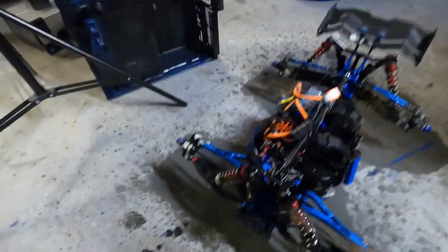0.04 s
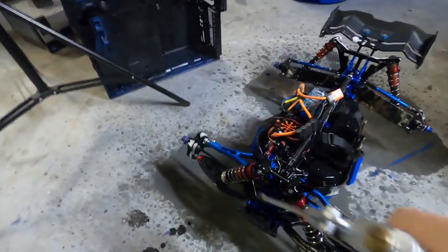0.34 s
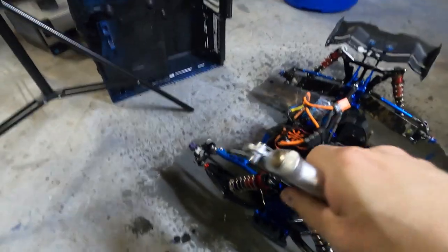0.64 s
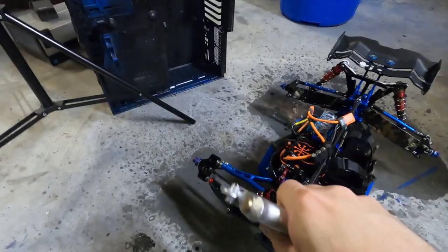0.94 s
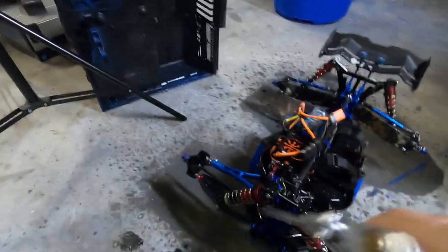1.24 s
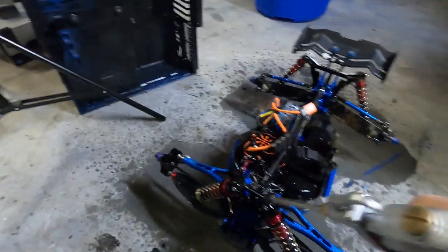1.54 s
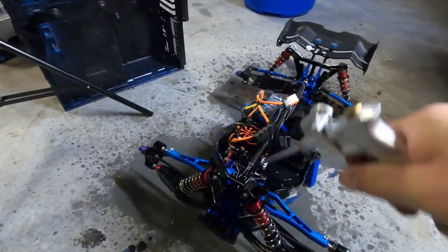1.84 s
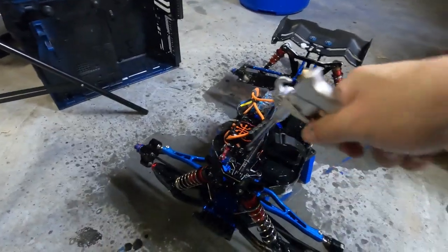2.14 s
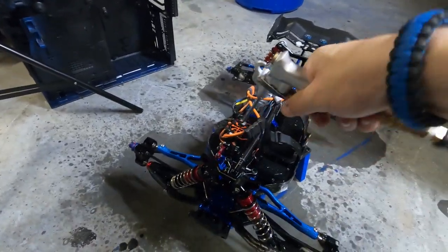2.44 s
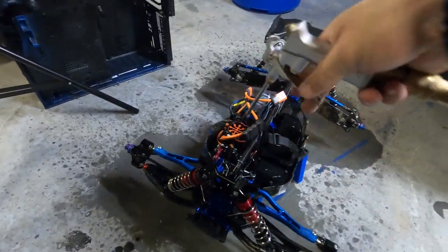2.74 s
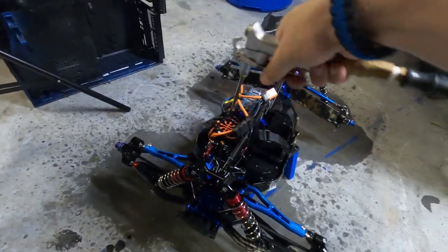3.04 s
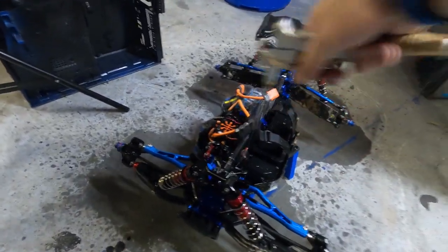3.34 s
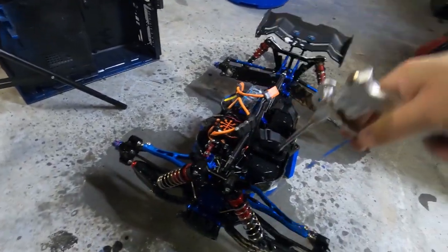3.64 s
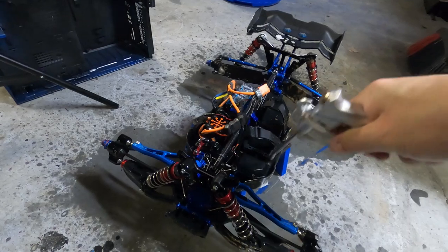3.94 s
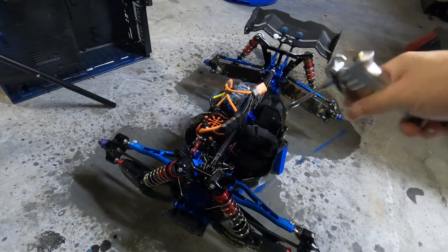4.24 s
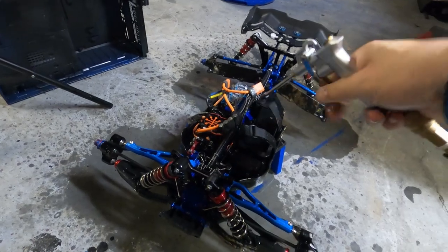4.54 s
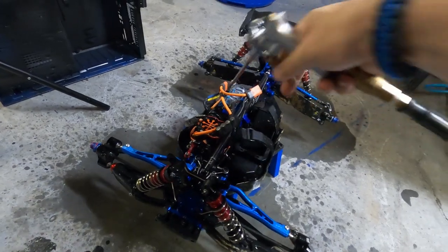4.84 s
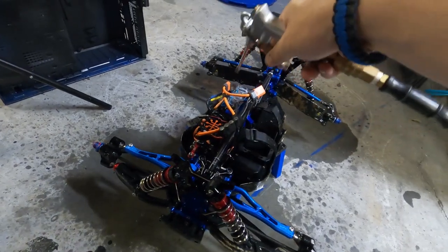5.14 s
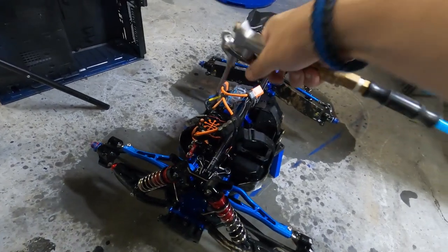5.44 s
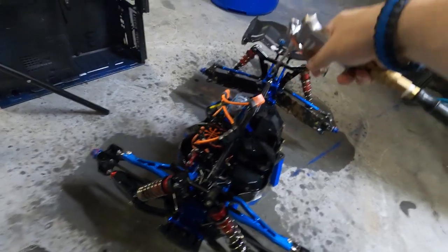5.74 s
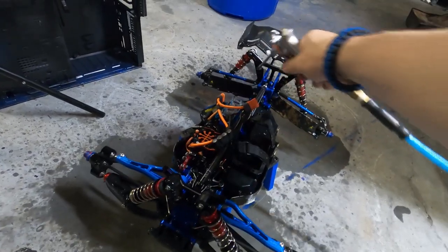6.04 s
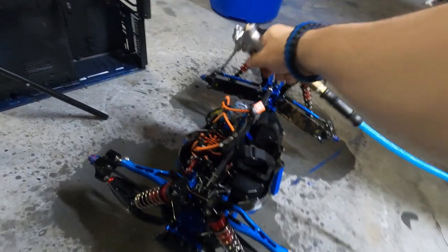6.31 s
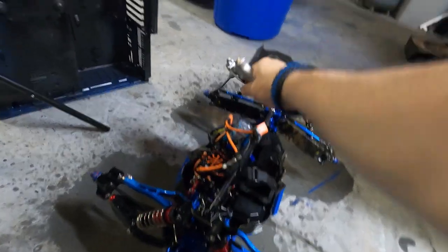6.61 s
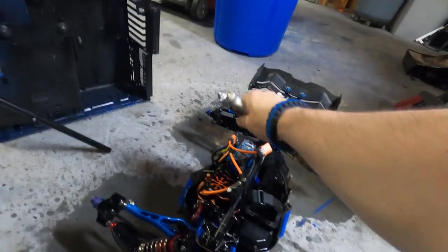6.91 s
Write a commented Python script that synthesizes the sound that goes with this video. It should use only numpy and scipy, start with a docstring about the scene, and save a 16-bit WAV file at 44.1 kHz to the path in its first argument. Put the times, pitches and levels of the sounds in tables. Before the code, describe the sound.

Close bursts of compressed air hiss and roar over a small wet model car, with faint trigger ticks and short pauses.

```python
"""Ten hissing blasts of an air blow gun, drying a small wet model car on a concrete garage floor.
The jet hisses at the nozzle, roars on the chassis, sounds its hollows and tears water into spray.
Close by, the trigger ticks and the valve shuts with a thump; stray air buffets the stereo microphone.
A short, diffuse tail follows each blast, over the garage's low, quiet room tone."""
import sys
import numpy as np
from scipy import signal
from scipy.fft import rfft, irfft, next_fast_len
from scipy.io import wavfile

SR = 44100
rng = np.random.default_rng(int(sys.argv[2]) if len(sys.argv) > 2 else 0)


def dump(signal):
    """Clip the signal to [-1, 1] and save it as 16-bit WAV at the path in sys.argv[1]."""
    limited = np.clip(np.atleast_2d(signal).T, -1, 1)
    pcm = np.round(limited * 32767).astype(np.int16)
    wavfile.write(sys.argv[1], SR, pcm)


N = 311787
TIME = np.arange(N) / SR
FREQS = np.maximum(np.arange(N // 2 + 1) * SR / N, 1)

# One row per trigger pull, with the relative level of each layer and of the tail that follows:
# open_s, shut_s, hiss_db, roar_db, hollow_db, sizzle_db, spray_db, wind_db, tail_db, thump_db
BLASTS = [(0.093, 1.302, -26, -26.5, -28.5, -35.5, -34.5, -59, 7.5, -55),
          (1.635, 2.61, -22.5, -29, -39.5, -30, -59, -49, 10.5, -31),
          (2.889, 3.562, -22.5, -30.5, -43.5, -30.5, -62, -43.5, 10.5, -28),
          (3.821, 4.157, -22.5, -31, -41.5, -30.5, -51, -43, 13, -24),
          (4.441, 4.665, -22, -28.5, -43.5, -33.5, -61, -41.5, 13.5, -25),
          (4.96, 5.172, -21.5, -32, -44.5, -29, -35, -36, 12.5, -19),
          (5.420, 5.621, -23, -31.5, -40.5, -34, -52, -40, 13, -24.5),
          (6.082, 6.485, -23.5, -24, -35.5, -34.5, -43, -43.5, 10, -25),
          (6.669, 6.901, -23.5, -27, -37, -32, -33, -45.5, 11.5, -22),
          (7.035, 7.2, -24.5, -27, -35.5, -31, -32.5, -44, 0, -40)]
OPENS, SHUTS, HISS_DB, ROAR_DB, HOLLOW_DB, SIZZLE_DB, SPRAY_DB, WIND_DB, TAIL_DB, THUMP_DB = (
    np.transpose(BLASTS))
# The blast each sample belongs to, including four fifths of the pause after it.
BLAST_AT = np.searchsorted((SHUTS[:-1] + 4 * OPENS[1:]) / 5, TIME)


def valve(crack_s, leak_db, rise_s, shut_s, surge_db, surge_s):
    """Airflow: the valve first leaks, then opens on the hose's stored pressure, and snaps shut."""
    flow = np.zeros(N)
    for start, end in zip(OPENS, SHUTS):
        leak = from_db(leak_db) * np.clip((TIME - start + crack_s) / crack_s, 0, 1) ** 2
        opening = np.clip((TIME - start + rise_s) / rise_s, 0, 1) ** 2
        surge = 1 + (from_db(surge_db) - 1) * np.clip(1 - (TIME - start) / surge_s, 0, 1)
        closing = np.clip(1 - (TIME - end) / shut_s, 0, 1) ** 2
        flow += np.maximum(leak, opening) * surge * closing
    return flow


# Resonances of the five parts of the jet's noise, heard close: pitch_hz, width_hz, level_db
HISS = [(3430, 1100, 0.5), (4010, 1230, 4), (5430, 970, -3.5), (6640, 2460, -6.5)]
ROAR = [(1176, 127, 1), (1468, 1100, 0.5), (1980, 640, -3)]
HOLLOW = [(586, 625, -2.5), (840, 385, 4)]
SIZZLE = [(9260, 1500, 0)]
SPRAY = [(10500, 8100, 12), (13000, 2600, -13)]
# The first three blasts sweep across the car and into its hollows: time_s, force_db, depth_db
SWEEPS = [
    [(.09, 6, -8), (.26, 0, -6), (.39, 1, -12), (.43, -4, 1.5), (.65, 0.5, -1.5), (.87, -4, 0.5),
     (1.0, 2, -4.5), (1.22, -1, 1), (1.3, -8, 5)],
    [(1.64, -2, 2.5), (1.8, 2, 2), (2.1, -1, -3.5), (2.23, 0, 4), (2.36, -0.5, -5), (2.47, .5, 3),
     (2.56, 0.5, -7.5)],
    [(2.89, -1, -2.5), (3.02, -2.5, 3.5), (3.12, -3, -10), (3.27, 1, 1.5), (3.35, 0, -6.5),
     (3.53, -0.5, 6.5)],
]
# The jet drops into a cavity and roars: middle_s, half_span_s, extra_depth_db
CAVITIES = [(.58, 0.13, 4.5), (4.12, 0.18, 2), (4.45, .05, 8.5), (4.63, 0.054, 4.5), (4.974, 0.036, 11.5),
            (5.51, 0.17, 9.5), (6.315, 0.034, 2)]
# It slips through a gap and briefly loses its target: middle_s, half_span_s, dip_db
SLIPS = [(.30, 0.021, 6), (1.73, 0.063, 6.5), (1.85, 0.1, 8), (3.225, 0.038, 2), (3.40, 0.032, 7),
         (4.0, 0.053, 12), (6.35, 0.028, 8), (6.48, 0.14, 4.5)]
# It finds a pocket of water and flings it out: middle_s, half_span_s, spray_db
SPLASHES = [(.355, 0.043, -28), (.475, 0.033, -31), (1.27, 0.15, -35.5), (1.72, 0.23, -30.5),
            (1.85, 0.13, -32.5), (2.01, 0.21, -32), (2.55, 0.1, -36), (2.92, .14, -30.5)]


def jet(puff_s, drying_db_per_s):
    """Air leaves the nozzle and breaks on the wet chassis; the spray thins as the spot dries."""
    age = np.maximum(TIME - OPENS[BLAST_AT], 0)
    force_db, depth_db = sum(in_time(sweep) * (BLAST_AT == k) for k, sweep in enumerate(SWEEPS))
    depth_db += swells(CAVITIES)
    impact_db = force_db - swells(SLIPS)
    puff_db = 2 * np.exp(-age / puff_s)   # the first slug of air hits harder
    # aiming deeper takes away hiss and adds roar
    hiss_db = HISS_DB[BLAST_AT] + impact_db - 0.12 * depth_db
    roar_db = ROAR_DB[BLAST_AT] + impact_db + 0.66 * depth_db + puff_db
    hollow_db = HOLLOW_DB[BLAST_AT] + force_db + depth_db + puff_db
    air = turbulence(HISS, hiss_db, flutter_db=2.0, flutter_hz=10)
    air += turbulence(ROAR, roar_db, flutter_db=1.77, flutter_hz=23)
    air += turbulence(HOLLOW, hollow_db, flutter_db=2.24, flutter_hz=37)
    air += turbulence(SIZZLE, SIZZLE_DB[BLAST_AT] + force_db, flutter_db=1.5, flutter_hz=29)
    water = from_db(SPRAY_DB[BLAST_AT] - drying_db_per_s * age) + swells_db(SPLASHES)
    return air + water * stereo_noise(resonances(SPRAY), pan_db=-4.0)


def turbulence(modes, level_db, flutter_db, flutter_hz):
    """Eddies excite resonances and make their level flutter."""
    return from_db(level_db + flutter_db * drift(flutter_hz)) * stereo_noise(resonances(modes))


# Passing bands of noise in the jet: start_s, end_s, pitch_hz, width_hz, level_db
BREATHY_BANDS = [(0.087, 0.337, 1840, 850, -25.5), (0.226, 0.273, 3760, 500, -21),
                 (0.415, 0.454, 930, 240, -24.5), (.33, 1.25, 4300, 584, -41), (1.636, 1.7, 2210, 190, -30),
                 (1.637, 1.70, 3750, 700, -23), (1.627, 2.2, 5360, 750, -30),
                 (2.185, 2.597, 3740, 500, -29.5), (2.3, 2.634, 2010, 400, -34),
                 (2.957, 3.217, 3970, 590, -24), (3.301, 3.367, 3730, 650, -22.5),
                 (3.53, 3.573, 840, 150, -35), (3.828, 3.957, 3580, 900, -27),
                 (4.114, 4.173, 3150, 500, -26.5), (4.438, 4.64, 1680, 704, -31),
                 (5.04, 5.166, 9070, 550, -27.5), (5.43, 5.44, 4220, 700, -17.5),
                 (5.462, 5.597, 2420, 166, -34), (5.453, 5.557, 3080, 400, -27.5),
                 (6.081, 6.467, 2980, 600, -30), (6.085, 6.2, 3750, 900, -28.5),
                 (6.208, 6.233, 8900, 600, -24.5), (6.656, 6.744, 2870, 300, -30.5)]


def breathy_bands(fade_s):
    """Bands of breathy noise, from narrow whistles to broad rushes, swell and colour the jet."""
    out, white = np.zeros(N), rng.standard_normal(N)
    for start, end, hz, width, db in BREATHY_BANDS:
        on = slice(*np.searchsorted(TIME, [start - fade_s, end + fade_s]))
        swell = np.clip(np.minimum(TIME[on] - start, end - TIME[on]) / fade_s + .5, 0, 1)
        b, a = signal.iirpeak(hz, hz / width, fs=SR)
        band = signal.lfilter(b, a, signal.lfilter(b, a, white[on]))
        out[on] += from_db(db) * swell * rms_one(band)
    return out


def thumps(hz, t60_s, gain_db, lag_s):
    """Just after the valve shuts, the stopped air column jolts the hose: one low, damped swing."""
    out = np.zeros(N)
    for start, db in zip(SHUTS + lag_s, THUMP_DB):
        age = np.maximum(TIME - start + .5 / hz, 0)
        attack = np.minimum(2 * hz * age, 1)
        decay = from_db(db + gain_db - 60 * age / t60_s)
        out -= attack * decay * np.sin(2 * np.pi * hz * age)
    return out


# The trigger meets the valve stem: start_s, level_db
TICKS = [(1.606, -36.5), (2.848, -44), (2.871, -27), (3.803, -31), (4.421, -28.5), (4.940, -29),
         (5.406, -20), (6.061, -30), (6.651, -38)]
# Its metal ring: pitch_hz, width_hz, level_db
TRIGGER_RING = [(2390, 500, -3), (3150, 1500, 5), (5640, 1200, -1), (9300, 2700, -10)]
# A light knock as the gun is moved: start_s, level_db
KNOCKS = [(1.575, -39)]


def handling():
    """The gun in the hand: metal ticks of the trigger and a dull knock."""
    ticks = bursts(TICKS, t60_s=0.01) * noise(resonances(TRIGGER_RING))
    knock = bursts(KNOCKS, t60_s=0.068) * noise(resonances([(512.0, 30, 0)]))
    return ticks + knock


# Gusts glance off the car towards the microphone: middle_s, half_span_s, level_db
GUSTS = [(.12, 0.045, -20), (.21, 0.25, -30), (.37, 0.072, -27), (1.68, 0.098, -31.5), (1.755, .05, -27.5),
         (1.87, 0.14, -36.5), (3.94, 0.053, -36.5)]
# Spectrum of wind on the microphone: frequency_hz, level_db
WIND_SPECTRUM = [(15, -5.5), (30, -1), (70, -4.5), (110, -4), (200, -6), (400, -21), (900, -35),
                 (3000, -55)]


def buffeting(flow, gain_db, lump_db, lump_hz):
    """Deflected air tumbles over the microphone ports, mostly the right one."""
    wind = flow * from_db(WIND_DB[BLAST_AT]) + swells_db(GUSTS)
    lumps = from_db(gain_db + lump_db * drift(lump_hz))
    rumble = stereo_noise(from_db(at_hz(WIND_SPECTRUM, FREQS)), side_db=6.0, pan_db=-7.5)
    return wind * lumps * rumble


def near_echoes(x, delays_s, echo_gain, sway, hand_hz):
    """Floor and chassis reflect the jet; the paths change as the hand moves, shifting the colour."""
    out, samples = x.copy(), np.arange(N)
    for delay in delays_s:
        read_at = samples - SR * delay * (1 + sway * drift(hand_hz))
        out += echo_gain * np.array([np.interp(read_at, samples, channel) for channel in x])
    return out / np.sqrt(1 + len(delays_s) * echo_gain ** 2)


# Decay of the tail in the garage: frequency_hz, t60_s
TAIL_DECAY = [(200, 0.17), (1000, 0.28), (4000, 0.4), (9000, 0.29), (15000, 0.15)]
# Its colour at the microphone: frequency_hz, level_db
TAIL_COLOUR = [(200, -18), (900, -24.5), (1700, -21), (2600, -21.5), (3900, -24.5), (6000, -22),
               (9500, -24.5), (14000, -39)]


def garage_tail(gun, hold_s, side_db):
    """A diffuse tail follows the gun: after each blast the level holds briefly, then each band dies away at its
    own pace."""
    out, edges_hz = np.zeros((2, N)), np.geomspace(100, 16000, 15)
    feed = from_db(TAIL_DB[BLAST_AT]) * gun.mean(axis=0)
    hold = np.exp(-1 / (SR * hold_s))
    white = rng.standard_normal((2, 2, N))   # neighbouring bands get unrelated noise
    for k, (low, high) in enumerate(zip(edges_hz, edges_hz[1:])):
        hz = np.sqrt(low * high)
        band = signal.butter(3, [low, high], "band", fs=SR, output="sos")
        retain = from_db(-60 / (SR * at_hz(TAIL_DECAY, hz))) ** 2
        power = signal.sosfilt(band, feed + 1e-9 * white[0, 0]) ** 2
        held = signal.lfilter([1 - hold], [1, -hold], power)
        energy = signal.lfilter([1 - retain], [1, -retain], held)
        mid, side = rms_one(signal.sosfilt(band, white[k % 2]))
        diffuse = mid + from_db(side_db) * side * [[1], [-1]]
        out += from_db(at_hz(TAIL_COLOUR, hz)) * np.sqrt(energy) * diffuse
    return out


# Spectrum of the quiet garage: frequency_hz, level_db
ROOM_TONE = [(25, -5.5), (60, 8), (130, 7.5), (260, 6.5), (450, -5.5), (700, -11.5), (1300, -7.5),
             (2400, -16), (4000, -24), (8000, -33.5), (15000, -65.5)]


def room_tone(gain_db):
    """Steady low noise all around the microphone."""
    return from_db(gain_db) * stereo_noise(from_db(at_hz(ROOM_TONE, FREQS)), side_db=4)


def from_db(db):
    """Decibels to gain."""
    return 10 ** (np.asarray(db) / 20)


def rms_one(x):
    """Scale to unit power."""
    return x / np.sqrt(np.mean(x ** 2) + 1e-20)


def in_time(rows):
    """Each column of a curve, at every sample."""
    times, *columns = np.transpose(rows)
    return np.array([np.interp(TIME, times, column) for column in columns])


def at_hz(points, hz):
    """Read a curve on a log-frequency axis."""
    frequencies, values = np.transpose(points)
    return np.interp(np.log(hz), np.log(frequencies), values)


def resonances(modes):
    """Gain per frequency of steep-sided resonances, added in power."""
    gains = (from_db(db) / (1 + ((FREQS - hz * hz / FREQS) / width) ** 2) for hz, width, db in modes)
    return np.sqrt(sum(gain ** 2 for gain in gains))


def noise(gain):
    """Unit-power noise shaped by a gain per frequency."""
    size = next_fast_len(N, real=True)
    shape = np.interp(np.arange(size // 2 + 1) * SR / size, FREQS, gain)
    return rms_one(irfft(rfft(rng.standard_normal(size)) * shape, size)[:N])


def stereo_noise(gain, side_db=-2, pan_db=0):
    """Noise common to both channels plus a part that differs; negative pan leans right."""
    sides = np.array([[1], [-1]])
    return (noise(gain) + from_db(side_db) * sides * noise(gain)) * from_db(sides * pan_db / 2)


def drift(rate_hz):
    """Random wander of spread 1, mostly slower than the given rate."""
    step = 16
    white = rng.standard_normal(next_fast_len(N // step + 2, real=True))
    hz = np.fft.rfftfreq(len(white), step / SR)
    slow = rms_one(irfft(rfft(white) / (1 + (hz / rate_hz) ** 2), len(white)))
    return np.interp(np.arange(N) / step, np.arange(len(slow)), slow)


def bursts(events, t60_s):
    """Envelope that jumps at each event and dies away."""
    return sum(from_db(db - 60 * np.maximum(TIME - s, 0) / t60_s) * (TIME >= s) for s, db in events)


def swells(events):
    """Rounded humps, each with its own middle, half span and height."""
    out = np.zeros(N)
    for middle, half_span, height in events:
        on = slice(*np.searchsorted(TIME, [middle - half_span, middle + half_span]))
        out[on] += height * np.cos(np.pi / 2 * (TIME[on] - middle) / half_span) ** 4
    return out


def swells_db(events):
    """Gain of humps whose heights are in decibels."""
    return swells([(middle, half_span, from_db(db)) for middle, half_span, db in events])


def scene():
    """Blasts and gun noises in the garage, near enough for stray air to reach the microphone."""
    flow = valve(crack_s=0.042, leak_db=-17, rise_s=0.011, shut_s=0.0066, surge_db=2.0, surge_s=0.048)
    sputter = from_db(0.31 * drift(150))   # water torn from the parts roughens the whole jet
    air = jet(puff_s=0.015, drying_db_per_s=0.5) + breathy_bands(fade_s=0.027)
    gun = flow * sputter * air + handling()
    heard = gun + garage_tail(gun, hold_s=0.024, side_db=1)
    heard = near_echoes(heard, [.0013, .0029, .0052, .0087], echo_gain=0.18, sway=0.0554, hand_hz=1.62)
    heard += thumps(hz=187, t60_s=0.028, gain_db=6.5, lag_s=0.0048)
    heard += buffeting(flow, gain_db=-3.5, lump_db=1.5, lump_hz=16)
    return heard + room_tone(gain_db=-49)


# Stereo width of the microphone, near mono after the first gusts: time_s, side_db
WIDTH = [(0, -3.5), (.35, -1.5), (.5, -9.5), (.7, -17.5), (.92, -27), (7.07, -42.5)]
# Its two ports differ more in some bands than in others: frequency_hz, side_db
WIDTH_COLOUR = [(100, -1), (600, 2), (1400, -5), (2300, 1.5), (3600, -14), (5400, 6.5), (8000, 3),
                (11000, 5)]
WIDE_ABOVE_HZ, CUTOFF_HZ = 12000, 15350


def record(dry):
    """The microphone's image narrows, except in the highest treble; the top is cut steeply."""
    mid, side = (dry[0] + dry[1]) / 2, (dry[0] - dry[1]) / 2
    width_db, = in_time(WIDTH)
    spectrum = rfft(side)
    treble = 1 / (1 + (WIDE_ABOVE_HZ / FREQS) ** 20)
    lower_side = irfft(spectrum * (1 - treble) * from_db(at_hz(WIDTH_COLOUR, FREQS)), N)
    side = irfft(spectrum * treble, N) + from_db(width_db) * lower_side
    lowpass = signal.ellip(10, .1, 80, CUTOFF_HZ, fs=SR, output="sos")
    return signal.sosfilt(lowpass, [mid + side, mid - side])


dry = scene()
out = record(dry)
dump(out)
```